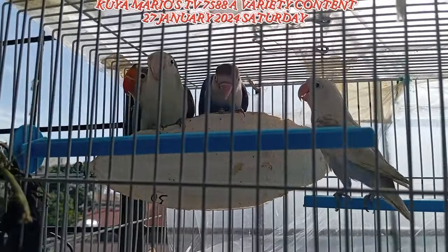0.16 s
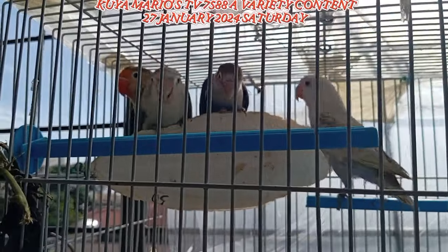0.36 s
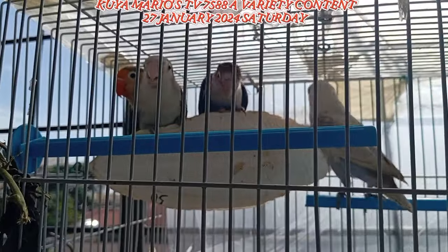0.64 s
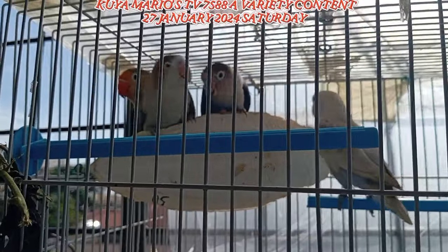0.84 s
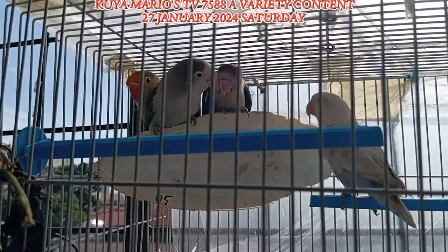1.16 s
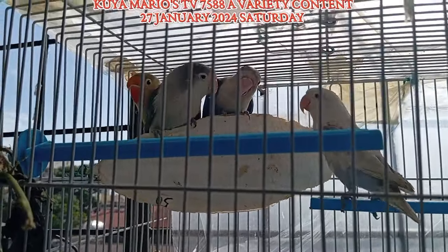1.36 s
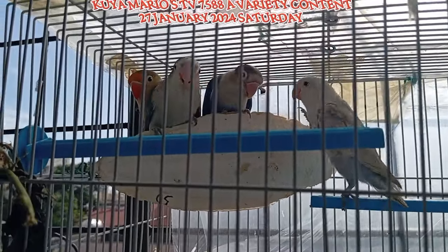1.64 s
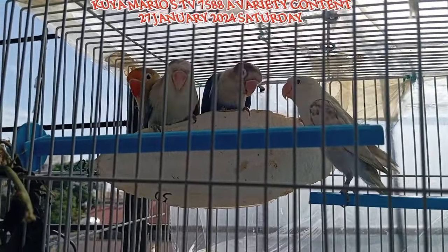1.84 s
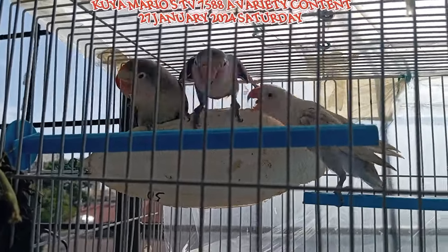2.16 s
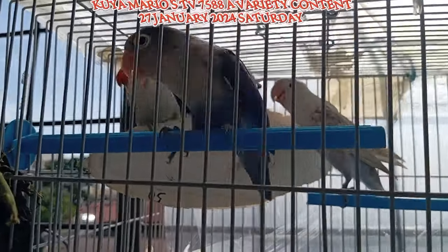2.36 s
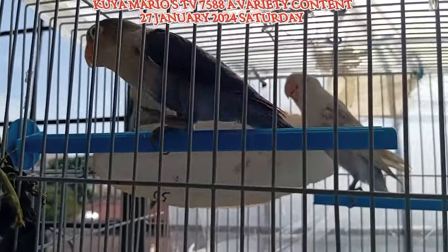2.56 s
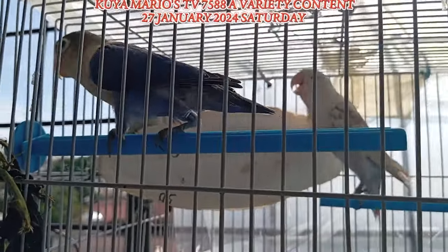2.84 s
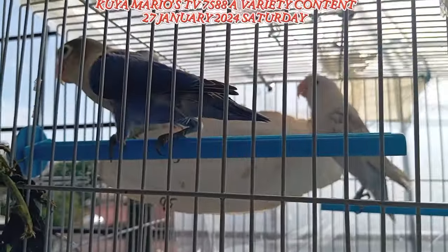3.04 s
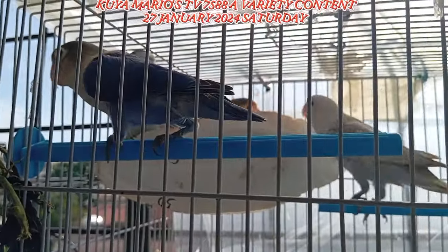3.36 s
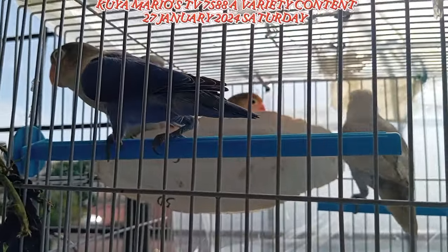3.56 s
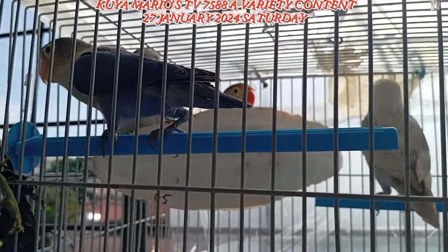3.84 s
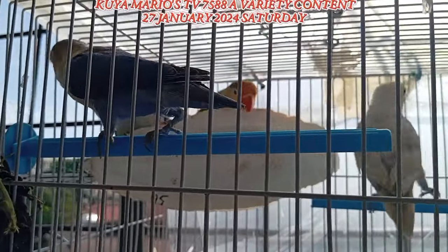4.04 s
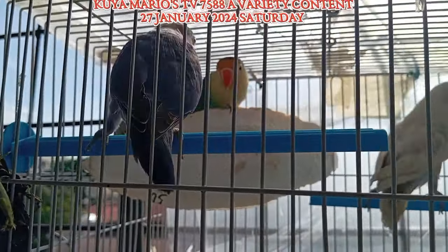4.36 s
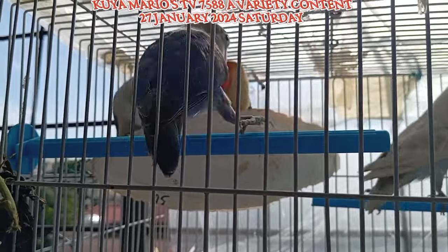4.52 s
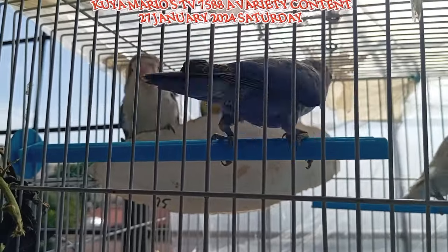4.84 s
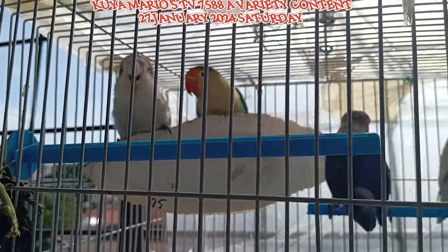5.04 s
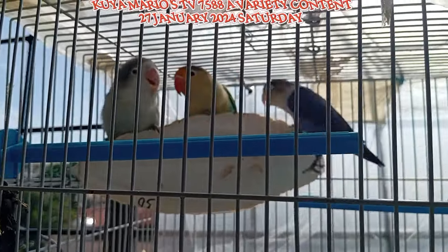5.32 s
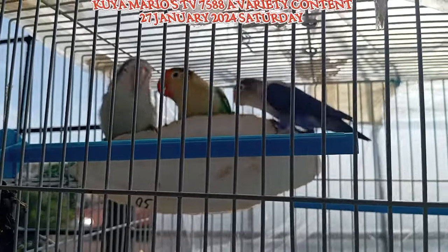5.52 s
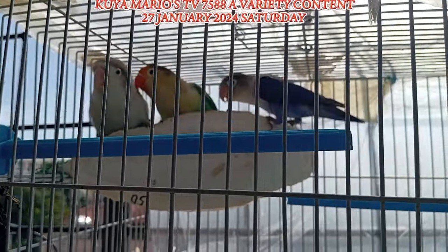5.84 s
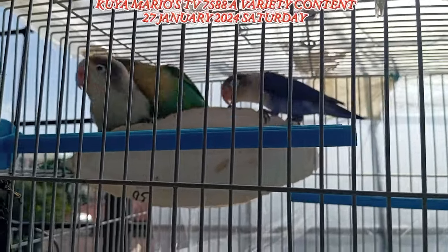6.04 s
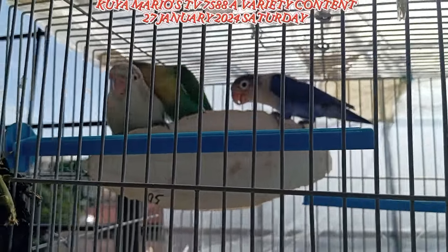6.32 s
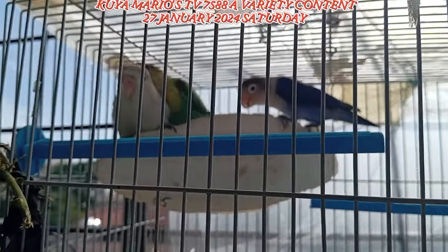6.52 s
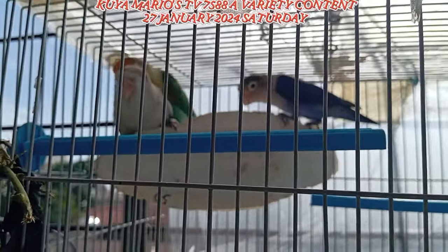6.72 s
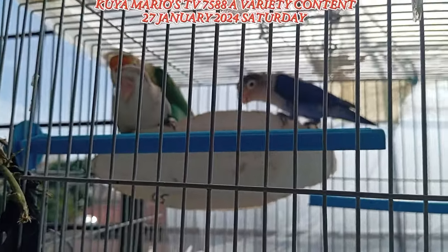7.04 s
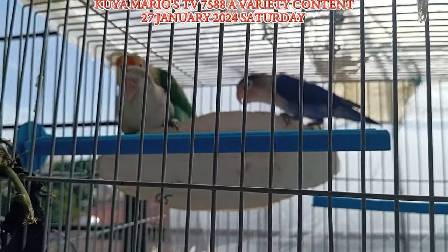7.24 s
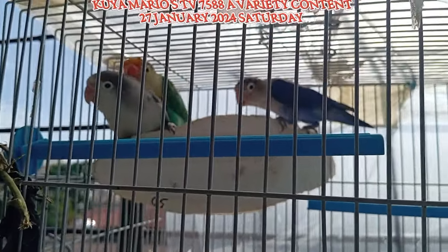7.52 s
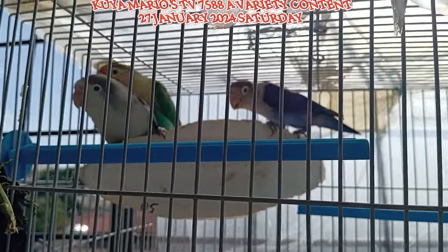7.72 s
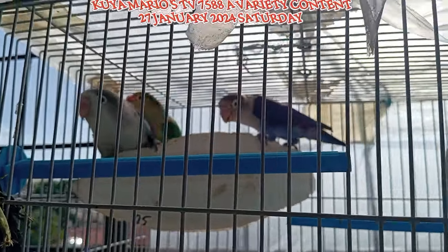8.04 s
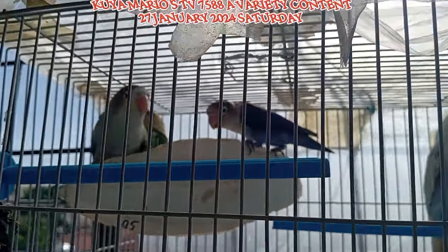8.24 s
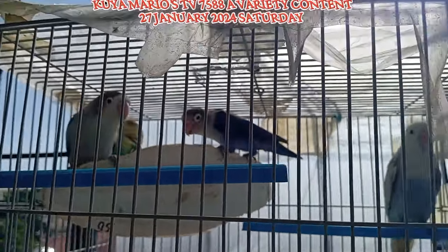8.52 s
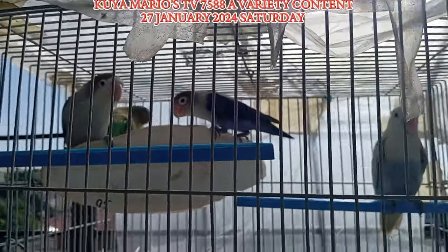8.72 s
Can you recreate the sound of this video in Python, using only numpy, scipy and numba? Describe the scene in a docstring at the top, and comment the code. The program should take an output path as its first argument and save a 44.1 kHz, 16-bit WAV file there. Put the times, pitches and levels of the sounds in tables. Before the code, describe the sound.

Several small parrots chirp, pip and chatter loudly in a wire cage, close up, over a low traffic rumble and faint distant dog barks.

```python
"""Under a roof, lovebirds chirp, tick, pip, warble and scold in a wire cage, close to the microphone.
Each voice is a gliding stack of overtones shaped by throat and beak; chirps leap from a reedy register to a whistle.
Claws and beaks tap the wires as noisy scrapes with damped rings, and a far dog barks in bursts of throaty noise.
The town rumbles as wavering noise bands, and a gain control ducks everything at each loud call."""
import sys
import numpy as np
from scipy import signal
from scipy.fft import rfft, irfft
from scipy.io import wavfile
from scipy.ndimage import map_coordinates
from numba import njit

SR = 44100
rng = np.random.default_rng(int(sys.argv[2]) if len(sys.argv) > 2 else 0)


def file_out(sig):
    """Save sig as 16-bit WAV at sys.argv[1]."""
    # one column per channel
    cols = np.atleast_2d(sig).T
    # limit, then scale
    lim = np.clip(cols, -1, 1)
    pcm = np.round(lim * 32767).astype(np.int16)
    wavfile.write(sys.argv[1], SR, pcm)


N = 391608

VOICE_DELAY_S = .008  # from a chirp's opening tick to its voice


def undb(db):
    """Decibels to gain."""
    return 10 ** (np.asarray(db) / 20)


def colour(hz, points):
    """Gain at these frequencies of a spectrum drawn through (Hz, dB) points."""
    f, db = np.transpose(points)
    return undb(np.interp(np.log(hz + 1), np.log(f), db))


def shaped(gain):
    """Noise of rms 1 with this spectrum."""
    x = irfft(rfft(rng.standard_normal(N)) * gain, N)
    return x / x.std()


def walk(count, rate):
    """Smooth random wander with a spread near 1, drawn from this many random points per second."""
    at = np.arange(count) * rate / SR
    points = rng.standard_normal(int(at[-1]) + 3)
    return map_coordinates(points, [at], order=2, mode="nearest")


def add(out, s, x):
    """Mix a sound in at time s."""
    i = max(int(s * SR), 0)
    out[i:i + len(x)] += x[:max(N - i, 0)]


def town(level_db=-29, flicker_db=2.5, rumble_hz=220):
    """Far traffic: octave bands of noise that waver on their own, over a rumble that swells slowly."""
    # Spectrum of the town. Each row: frequency in Hz, relative density in dB per Hz.
    town_spectrum = [(25, -67.5), (45, -11.5), (70, -4.5), (95, 4), (170, -0.5), (260, -1.5), (380, -7),
                     (500, -10.5), (650, -7), (850, -9), (1200, -13), (2000, -21), (4500, -33.5),
                     (16000, -47)]
    # Swell of the traffic's rumble. Each row: time in seconds, extra level in dB.
    rumble_swell = [(0, 0.5), (1.0, -8), (1.899, -1), (2.8, -6), (4.598, 0.5), (5.3, -4), (6.098, -1.5),
                    (6.8, -4.5), (7.6, 3.5), (8.8, 5)]
    hz = np.arange(N // 2 + 1) * SR / N
    rumble_db = np.interp(np.arange(N) / SR, *np.transpose(rumble_swell))
    spectrum = rfft(shaped(colour(hz, town_spectrum)))
    out = np.zeros(N)
    for centre in 32 * 2 ** np.arange(10):
        window = np.clip(1 - abs(np.log2((hz + 1) / centre)), 0, 1)
        band = irfft(spectrum * window, N)
        swell_db = rumble_db / (1 + (centre / rumble_hz) ** 2)  # mostly felt by the low bands
        out += band * undb(level_db + swell_db + flicker_db * walk(N, 9))
    return out


def beak(hz, s, low_hz=3100, high_hz=9500):
    """Gain of throat and beak at time s: the gape sets the low end, the way the bird faces sets the top."""
    # Resonance of throat and beak. Each row: frequency in Hz, gain in dB.
    throat_gain = [(1700, -19.5), (2300, -9.5), (3200, -5.5), (4300, 0.5), (5200, 6), (6500, 3),
                   (8000, 0.5), (10500, -4), (12500, -6), (14000, -17.5), (16000, -31)]
    # Tone of the calls as the birds turn and open their beaks.
    # Each row: time in seconds, extra dB under about 3 kHz, extra dB over about 9 kHz.
    pose = [(0, -3, .5), (1.0, -7, -1.5), (1.5, -6, 7.5), (2.85, 1.5, 7), (3.4, -6.5, 0.5), (4.1, -8, 5.5),
            (4.6, 3, 11.5), (5.0, -7.5, -4), (5.5, -5.5, 7.5), (6.1, -3.5, -2), (7.0, -2, 8.5),
            (7.6, -2, -4), (8.3, 1.5, 8)]
    times, low_db, high_db = np.transpose(pose)
    low = 1 / (1 + (hz / low_hz) ** 8)
    high = 1 / (1 + (high_hz / hz) ** 8)
    pose_db = np.interp(s, times, low_db) * low + np.interp(s, times, high_db) * high
    return colour(hz, throat_gain) * undb(pose_db)


def syrinx(points, trill_hz=185, jitter=0.032, flutter_db=2.0, reedy_db=-6, pure_db=-13, rasp_db=-20,
           overtone_db=3, edge_s=0.00248, lean=.25, throb_db=7):
    """One call along rows (s, Hz, dB, trill depth in octaves); jitter and rasp ease as the pitch climbs."""
    s, hz, db, depth = np.transpose(points)
    s = np.maximum.accumulate(s)
    t = np.arange(s[0], s[-1] + edge_s / 2, 1 / SR)
    n = len(t)
    depth = np.interp(t, s, depth)

    swing = 2 * np.pi * np.cumsum(trill_hz * (1 + .22 * walk(n, 90))) / SR
    trill = np.sin(swing + lean * np.sin(swing))  # each swing rises fast and falls slowly
    level_db = np.interp(t, s, db) - throb_db * depth * np.cos(swing)  # loudest as the pitch falls

    pitch = 2 ** (np.interp(t, s, np.log2(hz)) + depth * trill)
    reedy = np.interp(pitch, [2500, 6000], [1, 0])  # 1 in the low register, 0 in the whistle
    pitch = pitch * (1 + jitter * (1 + reedy) / 2 * walk(n, 694))
    phase = 2 * np.pi * np.cumsum(pitch) / SR

    k = np.arange(1, 8)[:, None]  # harmonic numbers
    slope_db = pure_db + reedy * (reedy_db - pure_db)  # per octave of overtones
    # the moving beak favours now one overtone, now another
    favour_db = overtone_db * np.array([walk(n, 120.5) for _ in k])
    partials = undb(slope_db * np.log2(k) + favour_db) * beak(k * pitch, s[0])
    partials = partials * (k * pitch < SR / 2)
    tone = (partials * np.sin(k * phase)).sum(0) / np.sqrt((partials ** 2).sum(0))
    # the slack membrane of the low register beats unevenly
    tone = tone * (1 + undb(rasp_db) * reedy * walk(n, 1700))
    edges = np.clip(np.minimum(t - t[0], t[-1] - t) / edge_s, 0, 1)
    return tone * edges * undb(level_db + flutter_db * walk(n, 341.94))


def tick(s, length, hz, db, scoop=0.8674, scoop_s=0.001893, fade_db=-5):
    """A few milliseconds of voice that scoop up to pitch and nearly hold it while fading."""
    rows = [(s, hz * scoop, db, 0),
            (s + scoop_s, hz, db, 0),
            (s + length, hz * 1.0126, db + fade_db, 0)]
    return syrinx(rows, jitter=0.0116, reedy_db=-8.0, rasp_db=-9.5, overtone_db=1.5)


def scold(s, length, hz, strained_hz, trill_hz, depth, widest_s, db, slope_db, slack_share=0.36,
          strain_db=-2, rise_s=.02, relax_s=.03):
    """A harsh trill: strain builds and relaxes; it raises the pitch, widens the swing and chokes the voice."""
    t = np.linspace(0, length, num=20)
    build = np.clip(1 + (t - widest_s) / rise_s, 0, 1)
    strain = build / (1 + (np.maximum(t - widest_s, 0) / relax_s) ** 2)
    pitch = hz * (strained_hz / hz) ** strain
    width = depth * (slack_share + (1 - slack_share) * strain)
    rows = np.transpose([s + t, pitch, db + strain_db * strain, width])
    return syrinx(rows, trill_hz, jitter=.02, reedy_db=slope_db, rasp_db=-15, throb_db=6)


def dog(rise_s=0.0218, echo_db=-13, echo_s=0.212):
    """Hoarse barks: throaty noise in bursts, blurred by distance and trailing off between the houses."""
    # Barks of the far dog. Each row: start in seconds, level in dB.
    barks = [(0.248, -21), (1.382, -22), (2.342, -20.5), (4.153, -19), (5.905, -22), (6.843, -22),
             (8.15, -24)]
    # Resonances of the dog's throat. Each row: frequency in Hz, width in Hz, gain in dB.
    muzzle = [(900.6, 213, -1), (1238, 1090, -13), (569, 170, -20)]
    hz = np.arange(N // 2 + 1) * SR / N
    t = np.arange(SR // 2) / SR
    throat = sum(undb(db) / (1 + (2 * (hz - f) / width) ** 2) for f, width, db in muzzle)
    burst = (t / rise_s) ** 2 * np.exp(2 - 2 * t / rise_s)
    trail = np.minimum(t / rise_s, 1) * np.exp(-t / echo_s)
    bark = burst + undb(echo_db) * trail
    effort = np.zeros(N)
    for s, db in barks:
        add(effort, s, undb(db) * bark)
    return effort * shaped(throat)


def pip(s, dip_s, hz, db, first=.76, sag_octaves_per_s=55, last=.83, settle=0.2006, attack_db=5, dip_db=-6,
        fade_db=-3, flick_s=0.0026, whistle_s=.017):
    """A pip sags from its first pitch, then flicks up to a whistle that settles lower."""
    crest, first_hz, last_hz = s + dip_s + flick_s, hz * first, hz * last
    dip_hz = first_hz * 2 ** (-sag_octaves_per_s * dip_s)
    settling_hz = last_hz + settle * (hz - last_hz)
    rows = [(s, first_hz * .92, db + attack_db, 0),
            (s + dip_s / 3, first_hz, db, .02),
            (s + dip_s, dip_hz, db + dip_db, .04),
            (crest, hz, db, .025),
            (crest + whistle_s / 2, settling_hz, db, .015),
            (crest + whistle_s, last_hz, db + fade_db, 0)]
    return syrinx(rows, reedy_db=-12.5, pure_db=-5.5)


def chirp(s, leap_s, whistle_s, high, sunk, whistle, db, raspy_hz=2234.2, raspy_share=0.24, glide_s=0.00207,
          crack=1.248, quiver=0.0328, bend=.02, second_ratio=1.13, second_db=-13, raspy_db=-4,
          crest_s=0.00718, sag=.94, fade_db=-7):
    """A low raspy start cracks upward, sinks, then leaps into an arched whistle; no two bend quite alike."""
    start, leap = s + VOICE_DELAY_S, s + leap_s
    flip = start + raspy_share * (leap - start)  # the voice cracks upward here
    low_bend, sink_bend = 1 + bend * rng.standard_normal(2)
    low = raspy_hz * low_bend
    voice = [(start, low * 0.98, db + 1.5, 0),
             ((start + flip) / 2, low, db + raspy_db, quiver),
             (flip - glide_s / 2, low, db + raspy_db, 3 * quiver),
             (flip, high * crack, db - 0.5, 3 * quiver),
             (flip + glide_s, high, db - 3.5, quiver),
             ((flip + leap) / 2, sink_bend * (high + 2 * sunk) / 3, db, quiver),
             (leap - glide_s, sunk, db, quiver)]
    whistled = [(leap + glide_s, whistle * .94, db - 3.5, 0),
                (leap + min(crest_s, whistle_s / 2), whistle * 1.02, db, quiver),
                (leap + whistle_s, whistle * sag, db + fade_db, quiver)]
    # before the leap a weaker second voice runs a little above the first
    second = [(at, hz * second_ratio, level + second_db, depth) for at, hz, level, depth in voice]
    rough = dict(jitter=.02, rasp_db=-13)
    main_voice = syrinx(voice + whistled, reedy_db=-7, pure_db=-13.5, overtone_db=2.0, **rough)
    return main_voice, syrinx(second, reedy_db=-2, **rough)


def cage(scrape=1.42, scrape_s=0.00235):
    """Claws and beaks tap the wires: a short noisy scrape and a damped ring."""
    # Taps on the cage. Each row: start in seconds, peak level in dB.
    taps = [(1.868, -35.5), (2.636, -31.5), (2.665, -21.5), (3.173, -19.5), (4.28, -24), (4.42, -28.5),
            (4.547, -13.5), (1.466, 1.5), (8.21, -23.5), (8.60, -28.5), (8.761, -12.5), (8.853, -17.5)]
    # Ringing modes of the wires. Each row: frequency in Hz, relative level in dB, 60 dB decay in seconds.
    modes = [(3025, -7.5, 0.0153), (4296, -10, 0.033), (5600, -16, 0.065), (6690, -21, 0.069),
             (8333, -11, 0.066), (12000, -32.5, 0.0198)]
    out, t = np.zeros(N), np.arange(SR // 10) / SR
    for s, db in taps:
        tap = scrape * rng.standard_normal(len(t)) * np.exp(-t / scrape_s)
        for f, mode_db, t60 in modes:
            strength = undb(mode_db) * rng.standard_normal()  # each tap excites the modes differently
            tap += strength * np.sin(2 * np.pi * f * t) * undb(-60 * t / t60)
        add(out, s, tap * undb(db) / abs(tap).max())
    return out


def note(s, length, first_hz, last_hz, db, break_hz=3535, slur_s=.004, pull=1.0, release_pull=0.665,
         edge_db=-4, fade_db=-2, quiver=0.0234):
    """A warbled note slurs in from the break between registers, slides, and leans back toward it as it ends."""
    slur = min(slur_s, length / 2)
    rows = [(s, first_hz * (break_hz / first_hz) ** pull, db + edge_db, 0),
            (s + slur, first_hz, db, quiver),
            (s + length - slur, last_hz, db + fade_db, quiver),
            (s + length, last_hz * (break_hz / last_hz) ** release_pull, db + fade_db + edge_db, 0)]
    return syrinx(rows, jitter=0.01524, reedy_db=-11, pure_db=-17.5, rasp_db=-21.5)


def lovebirds(tick_s=0.00487, tick_hz=2450, tick_db=-2):
    """All the calls of the flock, each sung by the syrinx; every chirp opens with a tick."""
    # Ticks. Each row: start in seconds, length in seconds, pitch in Hz, level in dB.
    ticks = [ (0.016, 0.0083, 2676, 0), (0.025, 0.00444, 2392, 15.5), (.183, 0.00825, 2177, 2),
             (.683, 0.0063, 2707, 8), (.757, 0.00657, 2334, 9), (.833, 0.00655, 2173, 3),
             (0.913, 0.0056, 2285, 8), (0.967, 0.0057, 2057, -8.5), (1.226, 0.0061, 2780, 11.5),
             (1.297, 0.0045, 2646, 4.5), (1.378, 0.00737, 2156, 7), (1.472, 0.00562, 2021, 7.5),
             (3.901, .0097, 2007, -12), (4.044, 0.0068, 2428, -3), (5.119, 0.00634, 3171, -1),
             (5.196, 0.00405, 2646, 4.5), (5.623, 0.0055, 2335, 2.5), (5.701, 0.0058, 2235, -3),
             (5.779, 0.0046, 2118, -1), (5.861, 0.00467, 2208, -10), (5.934, 0.00597, 2174, -4.5),
             (6.007, 0.00412, 1895, -3), (6.085, 0.0061, 1964, -4), (6.170, 0.00643, 2058, -4),
             (6.253, 0.00515, 2014, -2.5), (6.298, 0.00604, 4127, -1), (6.333, 0.00695, 2161, 0.5),
             (6.382, 0.0089, 2235, -8), (6.459, 0.0104, 2139, -5), (6.535, 0.0128, 2165, -7.5),
             (6.631, 0.0077, 2211, 3.5)]
    # Scolds. Each row: start in seconds, length in seconds, resting pitch in Hz, strained pitch in Hz,
    # swings per second, widest trill in octaves, time to the widest trill in seconds, level in dB,
    # low-register overtone slope in dB per octave.
    scolds = [(.037, .094, 3000, 4000, 165, .22, .044, 9, -7),
              (.208, .085, 2850, 3750, 180, .33, .055, 5, -8),
              (7.023, .132, 3450, 3950, 115, .5, .036, 6.5, -6),
              (7.248, .080, 3200, 3440, 200, .05, .034, 6, -1.5)]
    # Pips. Each row: start in seconds, time to the dip in seconds, whistle in Hz, level in dB.
    pips = [(0.293, 0.0014, 6607, 10), (.381, 0.00308, 6910, 15.5), (.471, 0.0073, 6407, 10),
            (0.53, 0.00166, 6222, 9), (0.611, 0.01095, 5690, 2.5), (0.7, 0.0125, 5194, 4.5),
            (.791, 0.0095, 5188, 6), (.884, 0.00933, 5252, 6), (.986, 0.0111, 4936, 5)]
    # Chirps. Each row: start in seconds, time to the leap in seconds, whistle length in seconds,
    # pitch after the crack in Hz, pitch before the leap in Hz, central whistle pitch in Hz, level in dB.
    chirps = [ (0.562, 0.0335, 0.01, 3566, 2874, 6640, 6.5),
              (1.585, 0.02026, 0.0101, 2788, 2374, 6840, 8.5), (2.082, .047, 0.0264, 2963, 2368, 5988, 6),
              (2.242, 0.0446, 0.028, 2558, 2198, 6348, 3.5), (2.518, .023, 0.0128, 2544, 2491, 6791, 4),
              (2.781, 0.0525, 0.027, 2752, 2249, 6210, 0.5), (2.926, 0.03216, 0.0104, 2839, 2725, 6127, 2),
              (3.244, 0.0559, 0.0176, 2876, 2299, 6395, 5), (3.372, 0.0486, 0.0122, 3104, 2518, 6460, 9.5),
              (3.432, 0.048, 0.0194, 2341, 2209, 6237, 9.5), (3.567, 0.0344, 0.018, 2964, 2764, 6230, 8.5),
              (3.655, 0.02354, 0.023, 2783, 2450, 6703, 7), (3.916, 0.0307, 0.014, 2487, 2374, 6640, 7),
              (3.936, 0.0368, 0.0125, 3091, 2800, 5590, 3), (4.052, 0.0427, 0.0066, 3287, 2777, 5840, 8.5),
              (4.093, .056, 0.0321, 2589, 2399, 6480, 9.5), (4.573, 0.029, 0.0304, 2518, 2378, 6880, 5.5),
              (4.880, 0.0394, 0.009, 3109, 2551, 5610, 4), (5.001, 0.0359, 0.0102, 2972, 2636, 4900, 3.5),
              (7.196, 0.0254, 0.0088, 2487, 2486, 6520, 10), (7.371, 0.0263, 0.0118, 2818, 2369, 6536, 3),
              (7.67, 0.0232, 0.0136, 2557, 2526, 6473, 6), (7.784, 0.04023, 0.0088, 2437, 2540, 6615, 5.5),
              (7.986, 0.044, 0.0466, 2544, 2620, 6692, 6), (8.299, .045, 0.0342, 2521, 2493, 6592, 4.5)]
    # Warbled notes. Each row: start in seconds, length in seconds, first and last pitch in Hz, level in dB.
    notes = [ (5.258, 0.0136, 2963, 4250, 11), (5.27, 0.01045, 3210, 2947, 1.5),
             (5.282, 0.0187, 4416, 4933, 11), (5.299, 0.0106, 5490, 6010, 7),
             (5.314, 0.0301, 4267, 3641, 8), (5.346, 0.0262, 5055, 4390, 8.5),
             (5.377, 0.00887, 3145, 4300, 4), (5.413, 0.029, 2515, 2429, 5),
             (5.442, 0.0293, 4560, 4880, 9.5), (5.474, .012, 2351, 2050, 7.5),
             (5.485, 0.026, 4134, 3033, 6), (5.51, .012, 4550, 5300, 6), (5.52, 0.0399, 2170, 2314, -1),
             (5.548, 0.0286, 4500, 5260, 3), (5.572, 0.0325, 4750, 5060, 4), (6.983, .041, 2316, 2512, 11),
             (7.232, 0.0138, 4395, 5440, 8.5)]
    out = np.zeros(N)
    for s, *shape, db in chirps:
        add(out, s, tick(s, tick_s, tick_hz, db + tick_db))
        for voice in chirp(s, *shape, db):
            add(out, s + VOICE_DELAY_S, voice)
    for call, table in ((tick, ticks), (scold, scolds), (pip, pips), (note, notes)):
        for row in table:
            add(out, row[0], call(*row))
    return out


def porch(x, early_db=-10, early_s=0.02272, tail_db=-18, tail_t60_s=.31, dull_hz=9000):
    """The roof and nest pot answer at once; the walls add a short, duller tail."""
    t = np.arange(SR // 2) / SR
    early = rng.standard_normal(len(t)) * np.exp(-t / early_s) * (t > .001)
    early = early / np.linalg.norm(early)
    tail = rng.standard_normal(len(t)) * np.exp(-np.log(1000) * t / tail_t60_s) * (t > .006)
    dull = signal.butter(2, dull_hz, fs=SR, output="sos")
    tail = signal.sosfilt(dull, tail / np.linalg.norm(tail))
    answer = undb(early_db) * early + undb(tail_db) * tail
    return x + signal.fftconvolve(x, answer)[:N]


def scene():
    """Birds and cage under the roof, the town and the dog beyond."""
    under_roof = porch(lovebirds() + cage())
    return (under_roof + dog() + town())[None]


@njit
def follow(x, attack, release):
    """Level follower that rises fast and falls slowly."""
    out, e = np.empty(len(x)), 0.
    for i in range(len(x)):
        e += (x[i] - e) * (attack if x[i] > e else release)
        out[i] = e
    return out


def record(dry, ceiling=0.9213, attack_s=0.000361, release_s=0.1252, top_hz=16000):
    """Gain control turns down levels over a ceiling and recovers slowly; peaks clip and the top is cut."""
    level = follow(abs(dry[0]), 1 / (1 + attack_s * SR), 1 / (1 + release_s * SR))
    # looking ahead, the gain falls just before each loud call
    level = np.interp(np.arange(N) + 2 * attack_s * SR, np.arange(N), level)
    held = dry * ceiling / np.maximum(level, ceiling)
    clipped = np.clip(held, -.87, .87)
    top_cut = signal.ellip(10, .2, 90, top_hz, fs=SR, output="sos")
    return signal.sosfilt(top_cut, clipped)


dry = scene()
out = record(dry)
file_out(out)
```